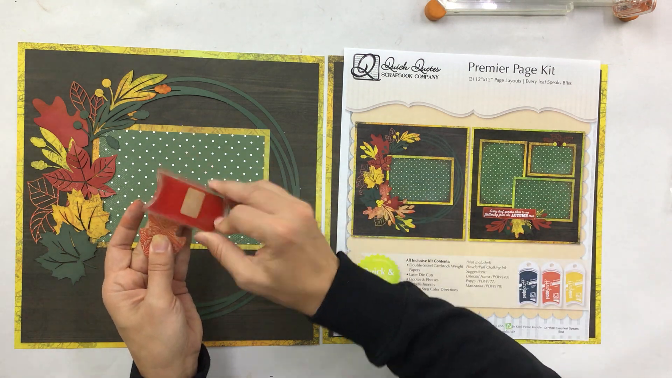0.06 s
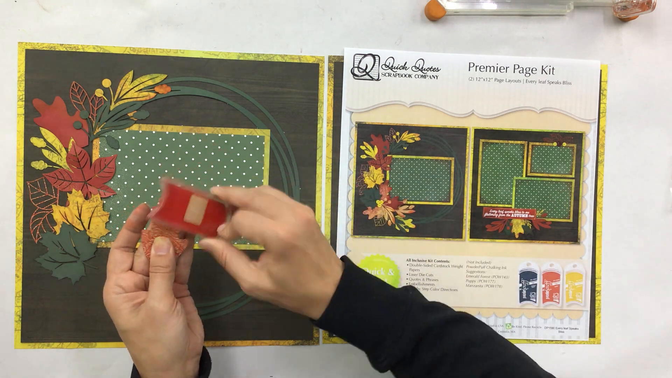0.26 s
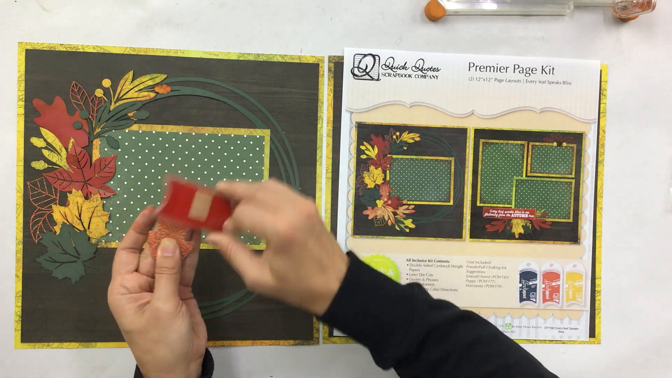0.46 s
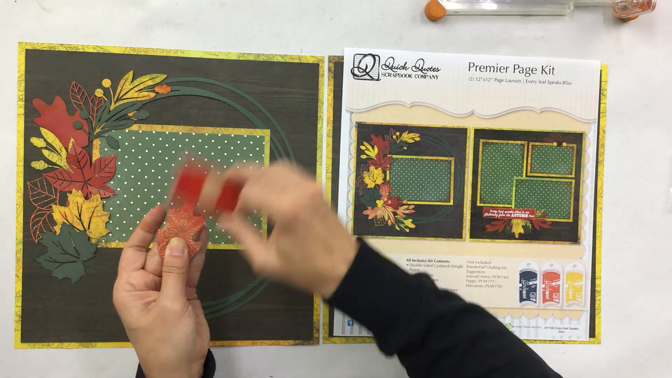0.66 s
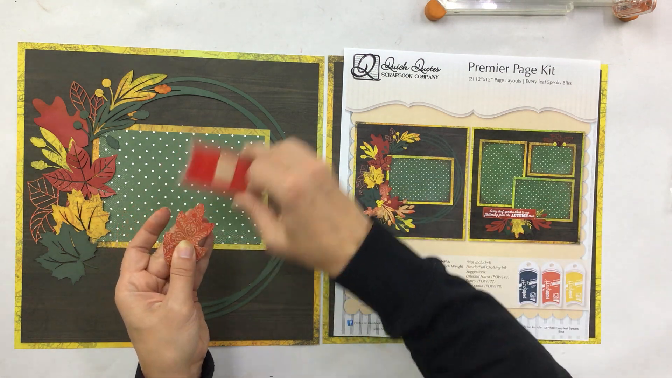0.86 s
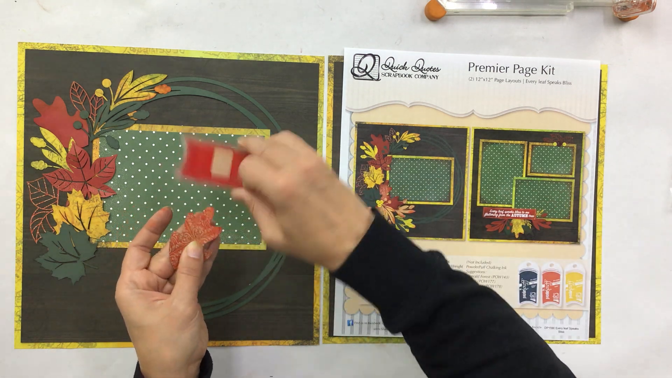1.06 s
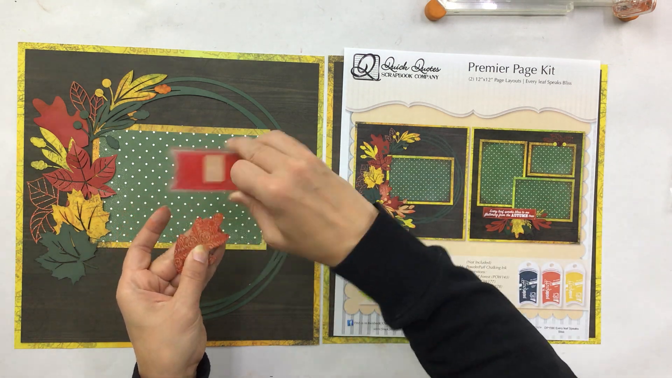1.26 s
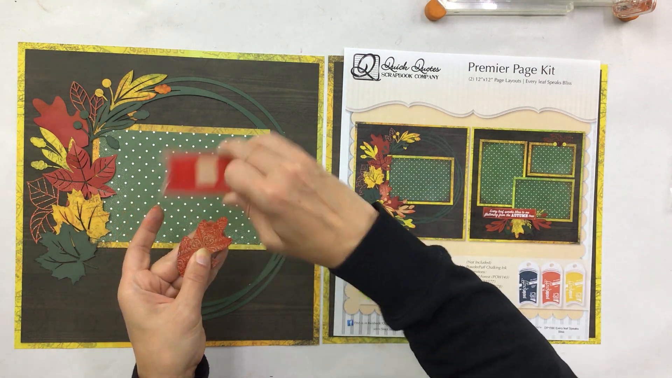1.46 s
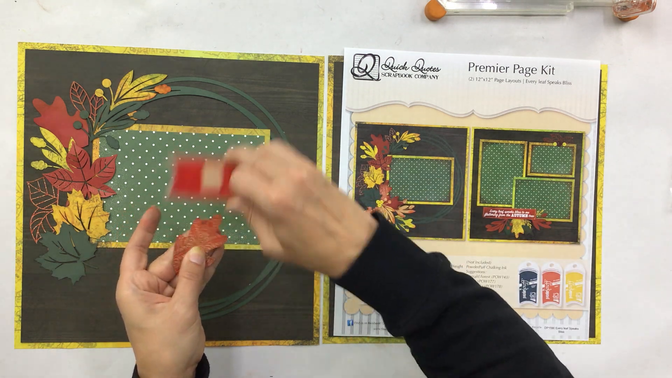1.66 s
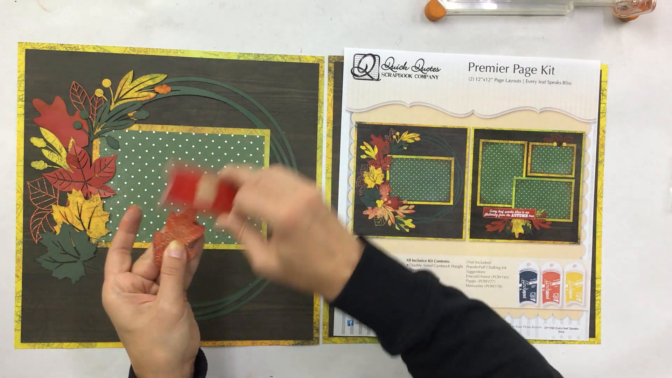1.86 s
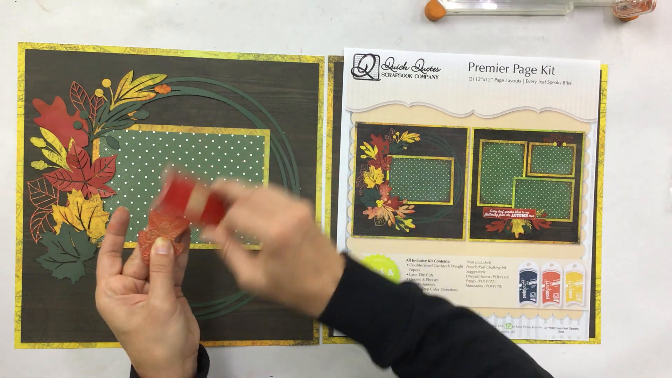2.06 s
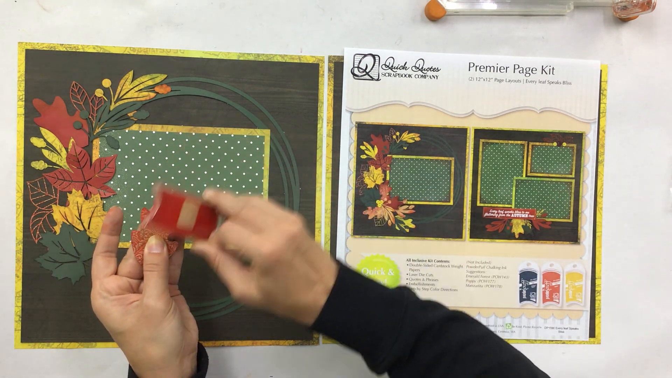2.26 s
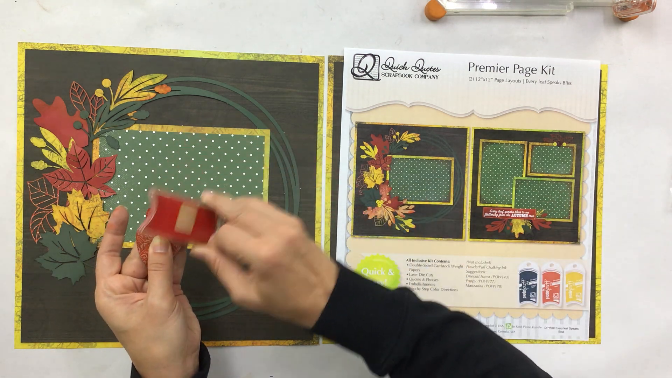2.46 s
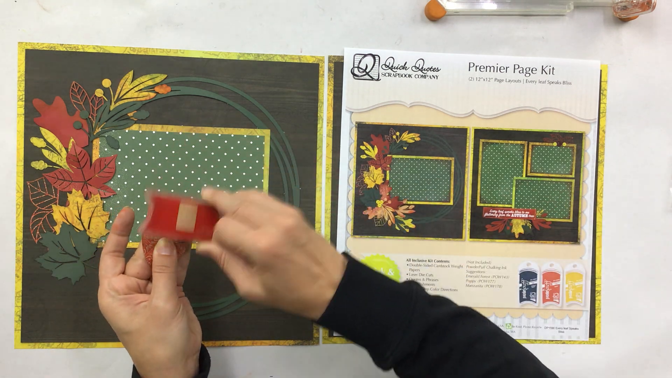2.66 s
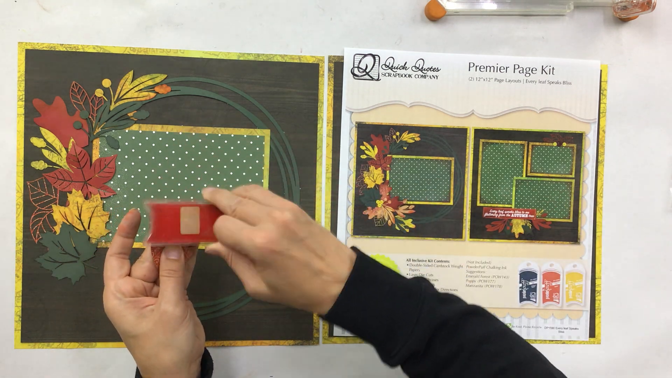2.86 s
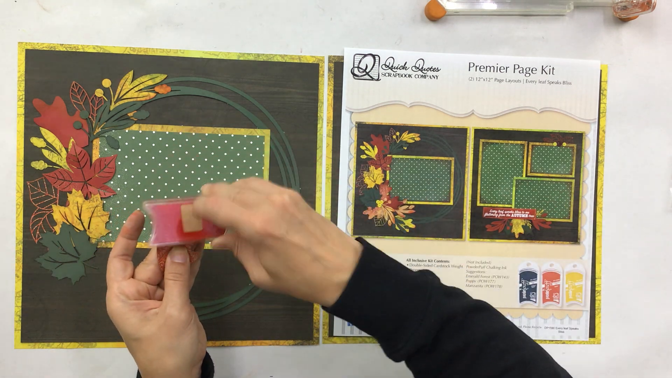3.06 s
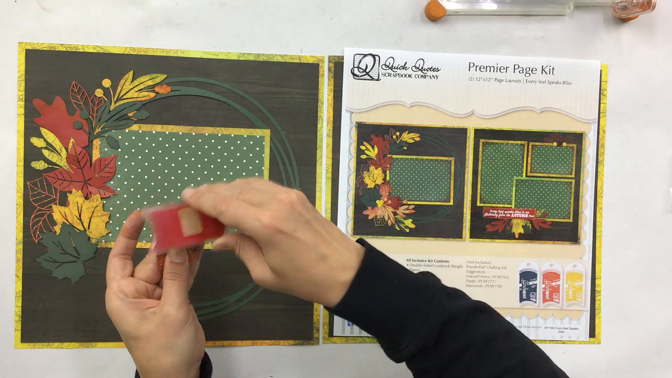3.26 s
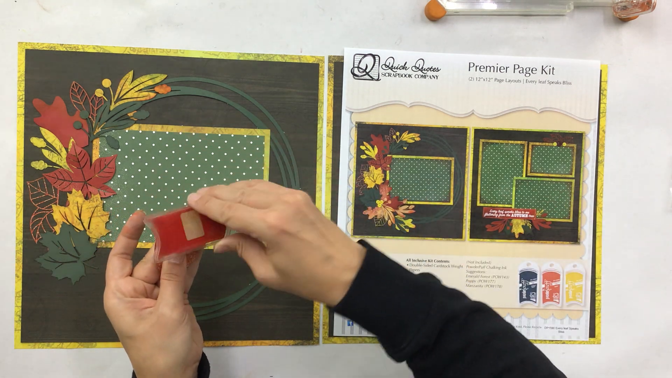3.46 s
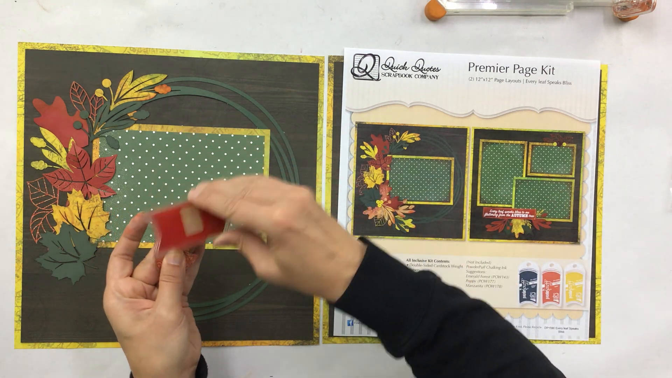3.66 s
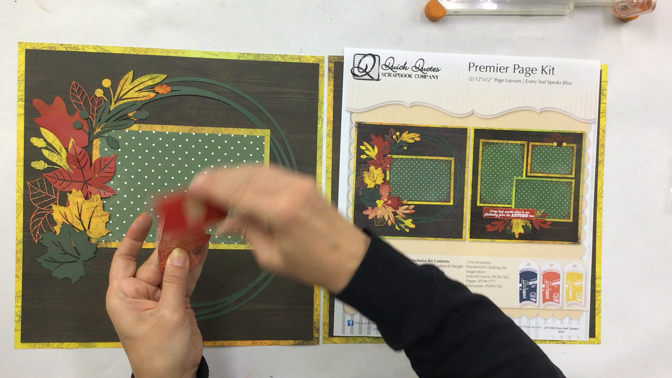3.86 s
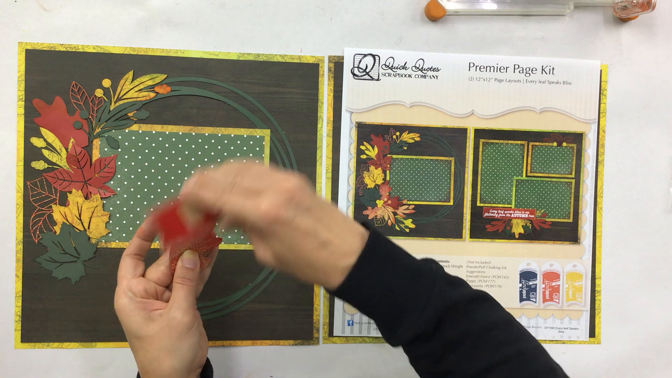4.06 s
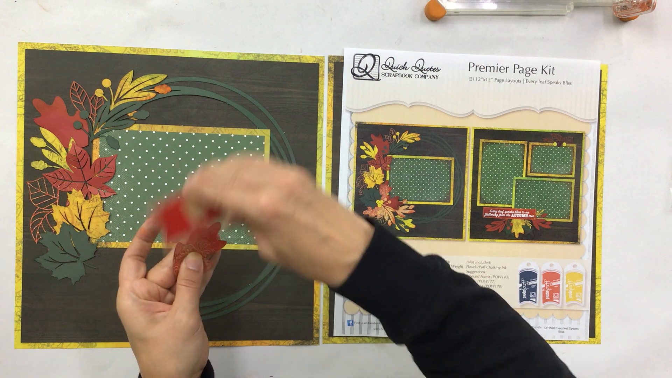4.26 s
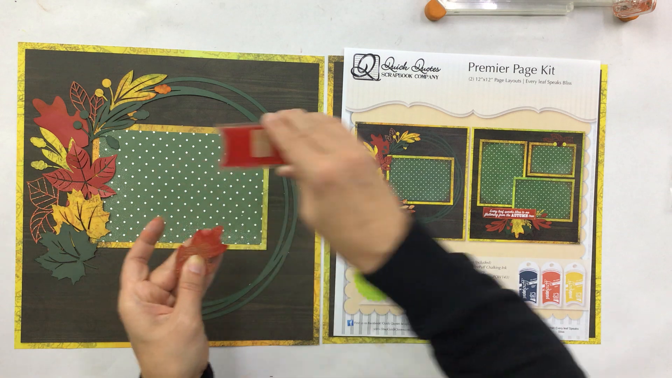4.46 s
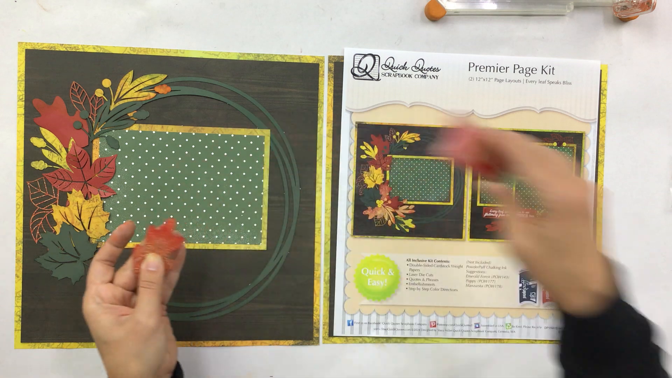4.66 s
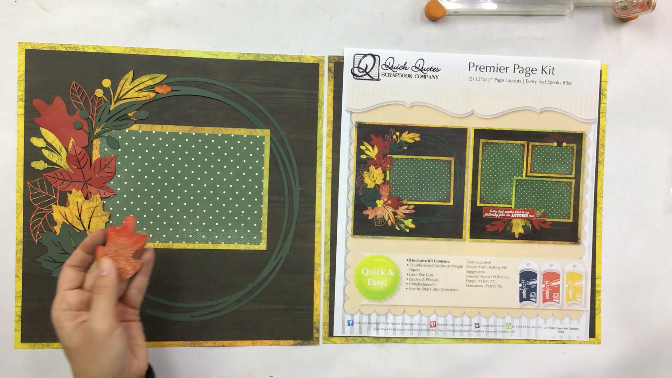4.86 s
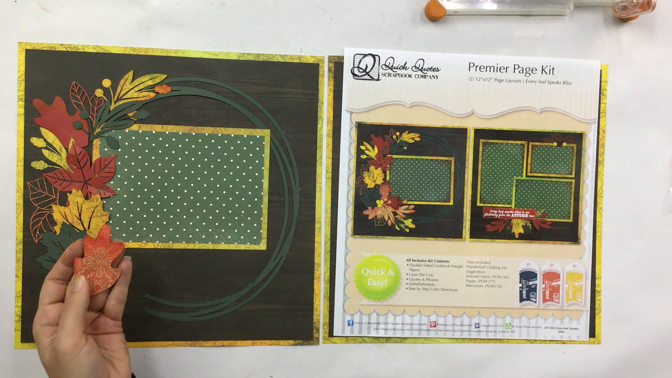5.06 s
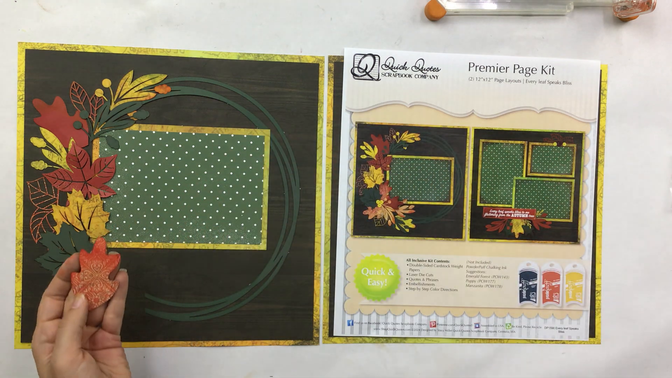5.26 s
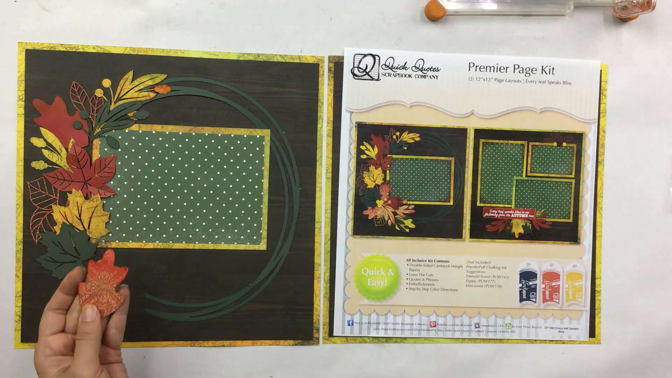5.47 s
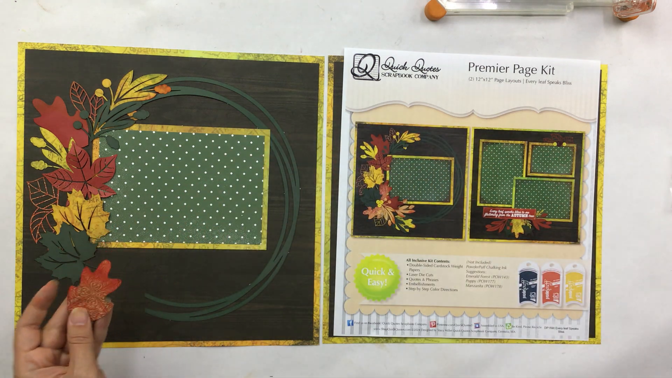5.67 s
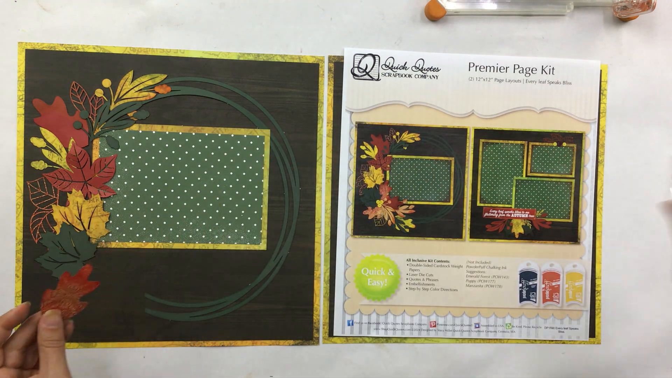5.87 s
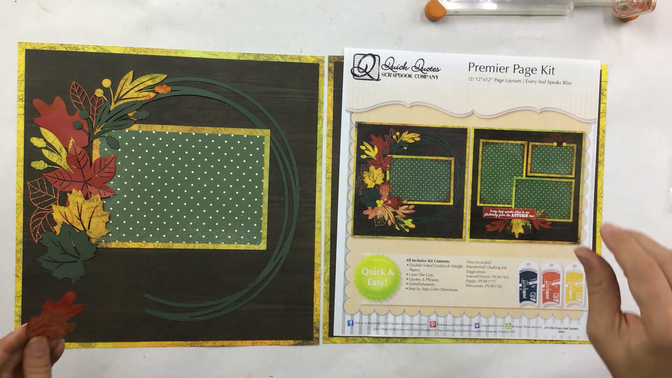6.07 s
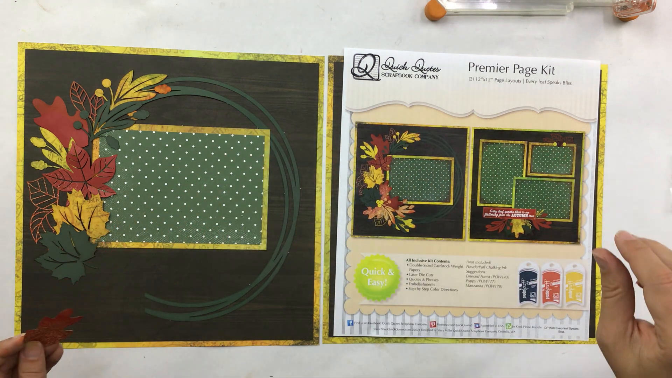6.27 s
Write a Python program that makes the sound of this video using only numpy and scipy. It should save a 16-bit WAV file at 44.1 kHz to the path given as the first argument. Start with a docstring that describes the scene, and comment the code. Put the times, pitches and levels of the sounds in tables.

```python
"""Crisp little snaps, each led in by a short soft hiss, come again and again over a low room hum.
A small ink pad is flicked past the edge of a stiff card leaf, held over a craft table in a small quiet room.
Foam brushing the card is swelling noise; each snap is a burst of noise ringing the card's resonances.
Later something hollow is knocked on the table: ringing low modes and a noisy rattle.
A sleeve rustles as moving bands of hiss; table and walls answer with echoes and a noisy tail."""
import sys
import numpy as np
from scipy import signal
from scipy.fft import rfft, irfft, next_fast_len
from scipy.io import wavfile

SR = 44100
rng = np.random.default_rng(int(sys.argv[2]) if len(sys.argv) > 2 else 0)


def elevation(decibels):
    """Turn decibel levels (scalar or array-like) into linear amplitude ratios."""
    levels = np.asarray(decibels, float)
    return 10 ** (levels / 20)


def unload_audio(sound):
    """Save the sound as a 16-bit wav file, at the path given as the first command line argument."""
    columns = np.transpose(np.atleast_2d(sound))
    # keep every value between -1 and 1, then stretch to whole-number steps
    steps = np.round(np.clip(columns, -1, 1) * 32767)
    wavfile.write(sys.argv[1], SR, steps.astype(np.int16))


N = 278226   # length in samples


def rms_one(x):
    """Scale to rms 1."""
    return x / np.sqrt(np.mean(x ** 2) + 1e-20)


def peak_one(rows):
    """Scale each row to an envelope top of 1."""
    return rows / np.abs(signal.hilbert(rows)).max(axis=1, keepdims=True)


def at_hz(table, hz, column=1):
    """Read a table between its rows, on a log-frequency axis."""
    table = np.array(table)
    return np.interp(np.log(hz), np.log(table[:, 0]), table[:, column])


def in_time(rows):
    """Turn each column of a curve into one value a sample."""
    s, *columns = np.transpose(rows)
    return [np.interp(np.arange(N) / SR, s, c) for c in columns]


def resonance(x, hz, width_hz):
    """Two-pole resonance with gain 1 on top."""
    r = np.exp(-np.pi * width_hz / SR)
    feedback = [1, -2 * r * np.cos(2 * np.pi * hz / SR), r * r]
    return signal.lfilter([(1 - r * r) / 2, 0, (r * r - 1) / 2], feedback, x)


def ring(clicks, hz, t60):
    """A unit click sets a sine of height about 1 ringing; it falls by 60 dB in t60 seconds."""
    r = elevation(-60 / (t60 * SR))
    w = 2 * np.pi * hz / SR
    return signal.lfilter([0, np.sin(w)], [1, -2 * r * np.cos(w), r * r], clicks + 1e-18)


def coloured(spectrum):
    """Steady noise with the given spectrum, rms 1."""
    size = next_fast_len(N)
    hz = np.arange(1, size // 2 + 2) * SR / size
    white = rfft(rng.standard_normal(size))
    return rms_one(irfft(white * elevation(at_hz(spectrum, hz)), size)[:N])


def crackle(count, peak_ms, size=400):
    """Rows of noise that swell at once, are strongest at peak_ms and die."""
    ms = np.arange(size) * 1000 / SR
    return rng.standard_normal((count, size)) * ms / peak_ms * np.exp(1 - ms / peak_ms)


def place(times, shapes):
    """Lay one short sound at each time."""
    out = np.zeros(N + shapes.shape[1])
    for s, shape in zip(times, shapes):
        at = round(s * SR)
        out[at:at + len(shape)] += shape
    return out[:N]


def waver():
    """Slow random drift, rms 1: noise smoothed by two equal low-pass poles."""
    corner_hz = 2.9
    r = np.exp(-2 * np.pi * corner_hz / SR)
    noise = rng.standard_normal(N + SR)
    return rms_one(signal.lfilter([1], [1, -2 * r, r * r], noise)[SR:])   # skip the filter's first second


# hum of the house over time, before its waver: start_s, lower_drone_db, upper_drone_db
DRONE_LEVELS = [(0, -75.5, -78), (.8, -79, -73.5), (1.7, -75.5, -75), (2.6, -81.5, -78.5),
                (3.4, -78.5, -76), (4.1, -72, -77.5), (5.06, -78.5, -76), (5.25, -68.5, -65),
                (5.4, -75.5, -77), (5.65, -71.5, -57.5), (5.87, -79, -76.5), (6.2, -72.5, -68.5),
                (6.31, -69, -67)]
# the two drones: pitch_hz, width_hz (of the first of two resonances)
DRONE_PITCHES = [(100, 14), (190, 41)]
# shape of the broad hum's spectrum: pitch_hz, relative_level_db (per Hz)
HUM_SPECTRUM = [(24, -54), (40, -31), (91, -11.5), (145, -6.5), (199, 3.5), (343, 2.5), (451, -6),
                (617, -12), (900, -36), (1170, -51), (1980, -120)]
# shape of the air hiss's spectrum: pitch_hz, relative_level_db (per Hz)
HISS_SPECTRUM = [(350, -27.5), (600, 1.5), (858, -1), (1280, 0.5), (3990, -3.5), (6370, -3.5),
                 (10000, -12.5), (11300, -8), (15100, -7.5), (16000, -18)]


def background():
    """Two wavering drones, each noise through two resonances, over broad hum and air hiss."""
    hum_db, hiss_db, waver_db = -77, -74, 2.5
    out = elevation(hum_db) * coloured(HUM_SPECTRUM) + elevation(hiss_db) * coloured(HISS_SPECTRUM)
    for db, (hz, width_hz) in zip(in_time(DRONE_LEVELS), DRONE_PITCHES):
        drone = resonance(rng.standard_normal(N), hz, width_hz)
        drone = rms_one(resonance(drone, hz, 2 * width_hz))
        out += elevation(db + waver_db * waver()) * drone
    return out


# first echoes off table, ceiling and walls: delay_ms, level_db (before the treble is softened)
FIRST_ECHOES = [(2.2, -18), (9.9, -12), (11.8, -33.5), (19.7, -35), (29.5, -16.5)]
# diffuse tail: pitch_hz, noise_level_db, t60_s (time to fall by 60 dB)
TAIL_BANDS = [(205, -30.5, 0.31), (505, -27.5, 0.19), (1195, -31, 0.23), (2000, -34.5, 0.23),
              (3040, -38, 0.33), (4480, -35, 0.29), (6500, -35.5, 0.22), (11000, -34, 0.19),
              (15100, -24.5, 0.11)]
# narrow bands that colour the tail: pitch_hz, level_db, t60_s
NARROW_TAIL_BANDS = [(1250, -47, 0.34), (1450, -59.5, 0.18), (2700, -50.5, 0.26), (4430, -44.5, 0.22),
                     (6500, -47.5, 0.19)]


def room(direct, sent):
    """A few clear echoes of the direct sound, then noise that dies band by band."""
    t = np.arange(SR // 2) / SR
    early = np.zeros(len(t))
    for ms, db in FIRST_ECHOES:
        early[round(ms * SR / 1000)] = elevation(db)
    echo_cut_hz = 7000
    early = signal.sosfilt(signal.butter(1, echo_cut_hz, fs=SR, output="sos"), early)

    # early on the reflections come in clumps, later they merge
    clumps = rms_one(resonance(rng.standard_normal(len(t)), 170, 450))
    build_up = (1 - np.exp(-t / 0.00052)) * elevation(2.0 * clumps * np.exp(-t / 0.012))
    tail = np.zeros(len(t))
    edges = 120 * 2 ** np.arange(0, 7.3, 1 / 3)   # Hz, a third of an octave apart
    for low, high in zip(edges, edges[1:]):
        hz = np.sqrt(low * high)
        band_pass = signal.butter(2, [low, high], "band", fs=SR, output="sos")
        band = signal.sosfilt(band_pass, rng.standard_normal(len(t)))
        fade_db = at_hz(TAIL_BANDS, hz) - 60 * t / at_hz(TAIL_BANDS, hz, column=2)
        tail += band * build_up * elevation(fade_db)
    for hz, db, t60 in NARROW_TAIL_BANDS:
        band = rms_one(resonance(rng.standard_normal(len(t)), hz, 0.16 * hz))
        tail += build_up * elevation(db - 60 * t / t60) * band
    return (signal.oaconvolve(direct, early) + signal.oaconvolve(sent, tail))[:N]


# sleeve moving over skin and table: start_s, level_db (before band weighting), centre_hz
SLEEVE_MOVES = [(0, -78, 5800), (2.4, -72.5, 6000), (2.8, -77.5, 6000), (3.6, -73.5, 6090),
                (4.65, -75.5, 6160), (4.95, -69.5, 6270), (5.25, -80.5, 5230), (5.45, -84, 5000),
                (5.7, -68, 9020), (5.8, -60.5, 11000), (5.9, -70.5, 10200), (6.0, -74.5, 8150),
                (6.15, -67, 5540), (6.24, -68.5, 5000), (6.31, -81, 4060)]


def sleeve():
    """Cloth hiss: overlapping bands of noise, those near the moving centre are heard."""
    db, centre_hz = in_time(SLEEVE_MOVES)
    out = 0
    for hz in np.geomspace(2500, 14000, 7):
        near = np.exp(-(np.log2(hz / centre_hz) / 0.22) ** 2)   # distance in octaves
        out = out + near * rms_one(resonance(rng.standard_normal(N), hz, 0.92 * hz))
    return elevation(db) * out


# hollow object set on the table, rocking and then dropping flat:
# start_s, ring_peak_db, rattle_peak_db, rattle_centre_hz
CONTACTS = [(5.4733, -60, -48, 6500), (5.4807, -29, -39, 870), (5.482, -52, -49.5, 2520),
            (5.491, -45, -48, 1100), (5.499, -43.5, -56, 2200), (5.511, -37, -52, 1490),
            (5.543, -53, -50, 2980), (5.55, -35.5, -38, 1080), (5.563, -55, -45, 1290),
            (5.6435, -48, -28, 5400), (5.6470, -39.5, -22.5, 2250), (5.6491, -53, -24.5, 1760),
            (5.656, -43, -24, 2200), (5.666, -39, -32.5, 2430), (5.678, -51, -28, 2000)]
# ringing modes of the object and the table: pitch_hz, relative_level_db, t60_s
HOLLOW_MODES = [(166.4, -3.5, 0.094), (282.2, -2, 0.31), (366, -2, 0.072), (436, -6, 0.089),
                (534, -1, 0.068), (680, 7, 0.02), (806, -3, 0.014), (1085, 3, 0.039), (1500, -8, 0.052)]


def knocks():
    """Every contact rings the low modes and shakes loose a noisy rattle that the room answers strongly."""
    room_db = 4   # share sent to the room
    rattle_peak_cycles = 2.75   # a rattle is strongest after this many cycles of its centre
    rows = np.array(CONTACTS)
    push = signal.lfilter(np.hanning(30) / 15, [1], np.eye(1, SR // 3)[0])   # soft click, 30 samples
    modes = np.array([elevation(db) * ring(push, hz, t60) for hz, db, t60 in HOLLOW_MODES])

    # each contact gets its own random balance of the modes
    balance = elevation(rng.normal(0, 1.4, (len(rows), len(HOLLOW_MODES))))
    balance = balance * (-1) ** np.arange(len(HOLLOW_MODES))
    blows = peak_one(balance @ modes) * elevation(rows[:, [1]])

    cycle_ms = 1000 / rows[:, [3]]
    shake = crackle(len(rows), rattle_peak_cycles * cycle_ms, size=SR // 3)
    rattle = [resonance(resonance(v, hz, 1.1 * hz), hz, 3 * hz) for v, hz in zip(shake, rows[:, 3])]
    rattle = peak_one(np.array(rattle)) * elevation(rows[:, [2]])
    sound = place(rows[:, 0], blows + rattle)
    return np.array([sound, sound * elevation(room_db)])   # direct, sent to the room


# foam strokes over the card, also read by bent():
# let_go_s, hiss_db, favoured_pitch_hz (of the bent card), favoured_gain_db
FOAM_STROKES = [(0.0545, -49.5, 1020, -2), (0.226, -51.5, 6800, 10), (0.421, -56.5, 1020, 7),
                (0.61, -52.5, 7000, 4), (0.793, -48, 11000, -4), (0.9725, -46, 1250, 6),
                (1.157, -57.5, 2280, 5.5), (1.349, -50, 6350, -2), (1.538, -46.5, 1370, 0),
                (1.7207, -45.5, 6900, 2.5), (1.9228, -49.5, 1030, -7), (2.101, -44.5, 3120, 3),
                (2.2671, -62, 2590, -0.5), (2.4615, -59, 1000, -1), (2.672, -56, 2800, 2),
                (2.8825, -51, 4500, -8), (3.0569, -51.5, 920, -4), (3.2475, -45, 1400, 1),
                (3.4636, -47, 6500, -13), (3.681, -50, 950, -3), (3.8793, -58, 1970, 4),
                (4.114, -59, 7150, 4), (4.3107, -41, 1620, 6), (4.5013, -53, 6600, 4.5)]


def brush():
    """The foam's hiss, broad noise, swells until the card lets go."""
    rise_ms = 8.7   # time constant
    s, db = np.transpose(FOAM_STROKES)[:2]
    marks = np.zeros(N)
    marks[(s * SR).astype(int)] = elevation(db)
    # a decay run backwards in time is a swell
    decay = np.exp(-1000 / (rise_ms * SR))
    swell = signal.lfilter([1], [1, -decay], marks[::-1] + 1e-18)[::-1]
    return swell * rms_one(resonance(rng.standard_normal(N), 1900, 4600))


def bent(shapes, times):
    """The fingers bend the card anew for each stroke, which favours one pitch; the free edge adds its own."""
    edge_hz, edge_db = 6400, -1.5   # the free edge rings here on every stroke
    width = .14   # width of each ring as a share of its pitch
    strokes = np.array(FOAM_STROKES)
    nearest = strokes[np.abs(strokes[:, 0] - times[:, None]).argmin(axis=1)]
    edge = elevation(edge_db) * resonance(shapes, edge_hz, width * edge_hz)
    bend = [elevation(db) * resonance(v, hz, width * hz) for v, (hz, db) in zip(shapes, nearest[:, 2:])]
    return shapes + edge + np.array(bend)


# points of the card snapping free: start_s, level_db (before the colouring below),
# brightness_db_per_octave, middle_db (raises the two middle resonances and lowers the outer two)
SNAP_POINTS = [(0.0455, -36.5, 1.5, 2), (0.0566, -33.5, 1, -4.5), (0.0585, -32.5, 3.5, 0.9),
               (0.2242, -21, 1.5, -0.7), (0.4208, -22, 3.5, -0.45), (0.6072, -26.5, 2, 0.5),
               (0.6157, -28, 0.1, -1.8), (0.7822, -34, 2.5, 0.5), (0.7933, -25.5, 2.5, -3.5),
               (0.9503, -55, -4, -4), (0.9623, -42.5, -7, 0.7), (0.9699, -29, 2.5, -1.5),
               (1.1576, -28, -2.5, 2.9), (1.163, -28, 2.5, -3.5), (1.334, -58.5, -9.5, 12),
               (1.3482, -24.5, 2.8, 1.5), (1.3495, -24.5, -0.0, -0.9), (1.5262, -32.5, -3.6, 0.5),
               (1.5285, -43, 0, 2.5), (1.537, -20, 2, 0), (1.711, -40, -7, 5), (1.7217, -22.5, 2, 1.5),
               (1.724, -25.5, 0.6, -1.6), (1.9145, -45.5, -3.5, -6.5), (1.9211, -27, 2.2, 0.5),
               (2.0898, -32.5, -2, -1.5), (2.099, -32, 4.3, 3), (2.1011, -34, 0.4, -1.5),
               (2.267, -24, 2.5, -2.6), (2.2748, -28, 1.9, -5.5), (2.2774, -32.5, 7, 9.2),
               (2.461, -22.0, 1, 0.7), (2.4689, -29, 5.4, -3), (2.6067, -61, -3.2, 6),
               (2.618, -52, -3, -2.5), (2.67, -37.5, 0.1, -0.1), (2.862, -54, 2, -2.7),
               (2.8646, -51, -3, -1), (2.8784, -27.5, 1.5, -1.5), (3.0498, -44, -1, -2.5),
               (3.0593, -31, 0.1, -1.1), (3.2337, -44, 1, -14), (3.2374, -31, -2.6, 0),
               (3.2436, -24.5, 3.5, -1.1), (3.4551, -31, -3.5, 2.5), (3.458, -41, -9.5, 8),
               (3.4626, -26.5, 3, -2.8), (3.6714, -46, -8.5, 1.5), (3.678, -42, 5.5, -4),
               (3.6807, -31, 1.2, 0.6), (3.8791, -35.5, -2.5, 1.8), (3.88, -30, 2.9, -1.9),
               (3.8816, -32, -3.5, 5), (3.8861, -30.5, 0.5, -1.6), (4.1145, -28, 4, 1.5),
               (4.1167, -27.5, -2.6, 0.3), (4.3027, -34, 0, 4.8), (4.3068, -23.5, 0, 1.9),
               (4.3096, -35.5, -3, -1.1), (4.498, -52, 0.6, 15), (4.5023, -33, 5, 1.7),
               (4.5043, -22.5, 0.1, 1.2)]
# the card's broad resonances: pitch_hz, width_hz (of the first of two passes), relative_level_db
CARD_RESONANCES = [(1100, 1534, -1), (2790, 1595, 3), (6500, 6950, 7.5), (12770, 15900, 5)]


def card():
    """Each snap is a burst of crackle in the card's broad resonances, plus the pad's dull push."""
    snap_peak_ms, flutter_peak_ms = .225, .8
    flutter_db = -21   # the freed point trembles on a little
    tilt_pivot_hz = 4000
    thud_hz, thud_width_hz, thud_db = 390, 800, -7   # dull push, dB relative to the lowest resonance
    room_db = -1.5   # share sent to the room
    rows = np.array(SNAP_POINTS)
    times = rows[:, 0]
    flutter = elevation(flutter_db) * crackle(len(rows), flutter_peak_ms)
    toward_mic = crackle(len(rows), snap_peak_ms) + flutter
    # the room gathers all directions, so the crackle's chance colour is partly evened out to a plain click
    all_round = np.eye(1, 400) + 0.18 * crackle(len(rows), snap_peak_ms)

    centre_hz, widths_hz, card_db = np.transpose(CARD_RESONANCES)
    tilt_db = rows[:, [2]] * np.log2(centre_hz / tilt_pivot_hz)
    middle_db = rows[:, [3]] * [-1, 1, 1, -1]
    db = rows[:, [1]] + card_db + tilt_db + middle_db
    levels = elevation(np.c_[db, db[:, 0] + thud_db])

    # a low push spreads alike to all sides
    thud = -peak_one(resonance(all_round, thud_hz, thud_width_hz))
    paths = []
    for burst in toward_mic, all_round:
        parts = [peak_one(resonance(resonance(burst, hz, width_hz), hz, 2 * width_hz))
                 for hz, width_hz in zip(centre_hz, widths_hz)]
        parts.append(thud)
        # flip the sign of every second part
        paths.append(sum(part * levels[:, [k]] * (-1) ** k for k, part in enumerate(parts)))
    direct = place(times, paths[0])
    sent = place(times, bent(paths[1], times)) * elevation(room_db)
    return np.array([direct, sent])


def scene():
    """Card, foam and knocks in the room over sleeve and background."""
    direct, sent = card() + knocks() + brush()
    return (direct + room(direct, sent) + sleeve() + background())[None]


def band_limit(x):
    """A steep low-pass at the top of the band."""
    return signal.sosfilt(signal.butter(12, 16990, fs=SR, output="sos"), x)


def record(dry):
    """The microphone cuts the lowest bass and the very top."""
    bass_cut_hz, top_hz = 70, 15900
    x = signal.sosfilt(signal.butter(2, bass_cut_hz, "high", fs=SR, output="sos"), dry)
    x = signal.sosfilt(signal.butter(10, top_hz, fs=SR, output="sos"), x)
    return band_limit(x)


dry = scene()
out = record(dry)
unload_audio(out)
```